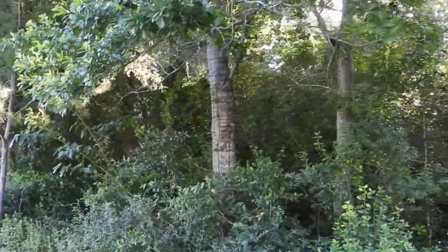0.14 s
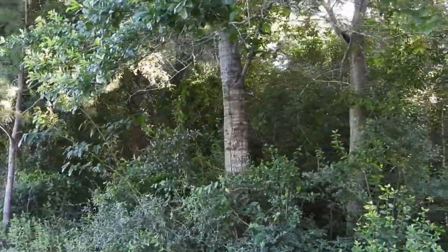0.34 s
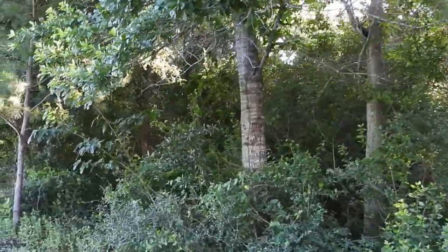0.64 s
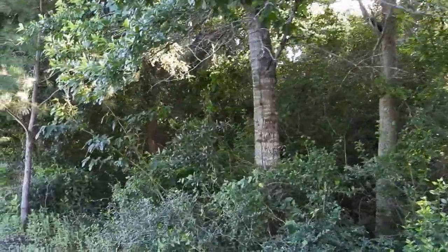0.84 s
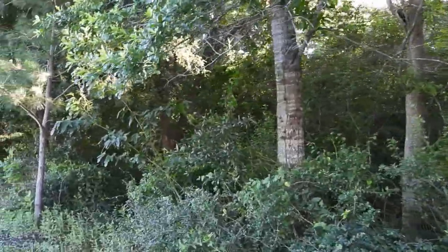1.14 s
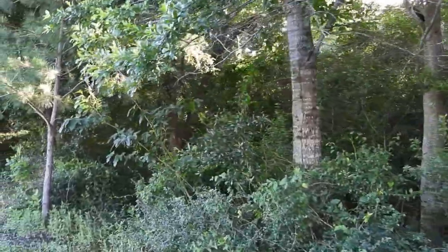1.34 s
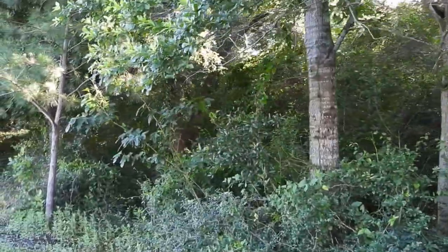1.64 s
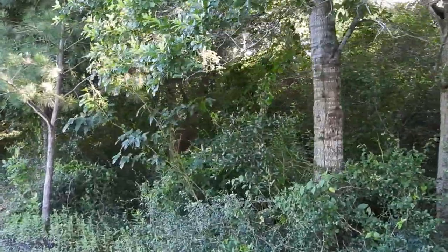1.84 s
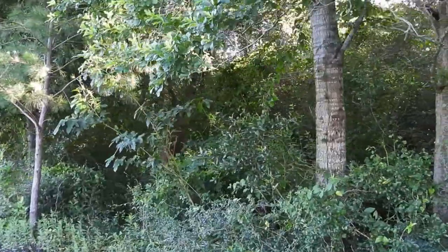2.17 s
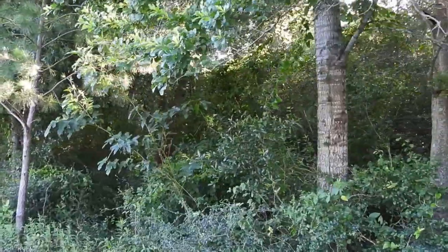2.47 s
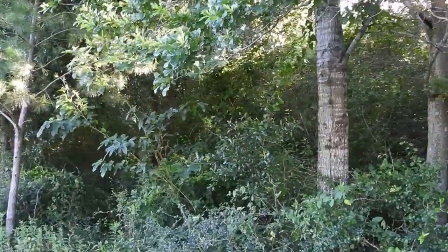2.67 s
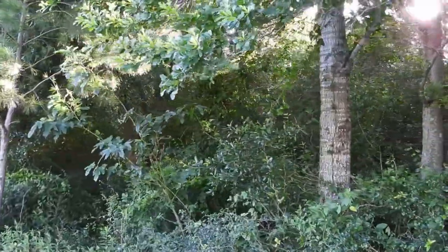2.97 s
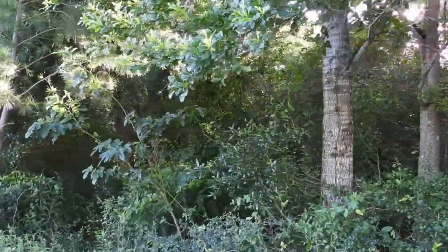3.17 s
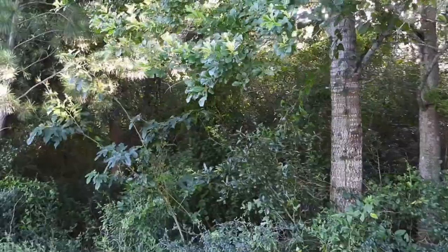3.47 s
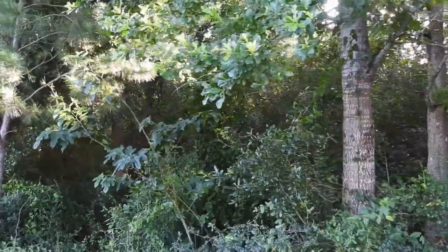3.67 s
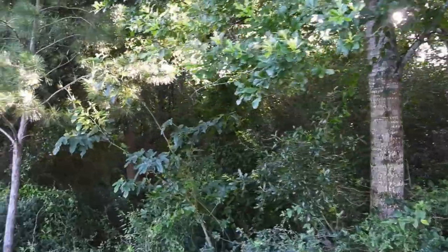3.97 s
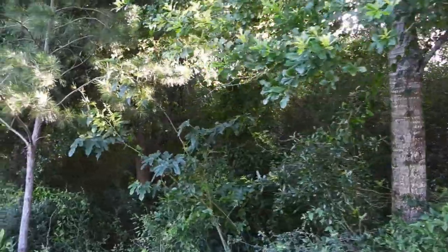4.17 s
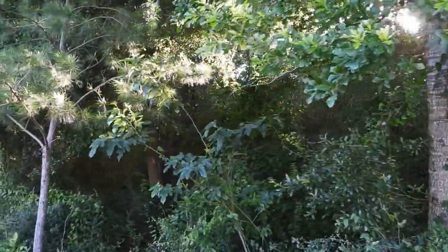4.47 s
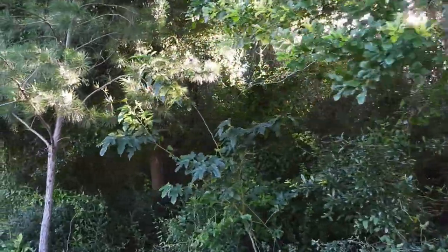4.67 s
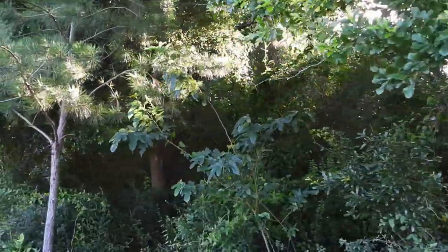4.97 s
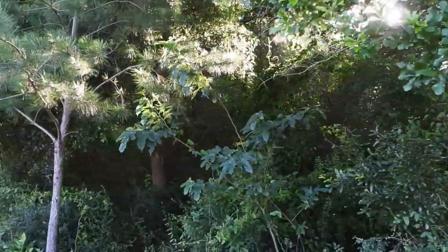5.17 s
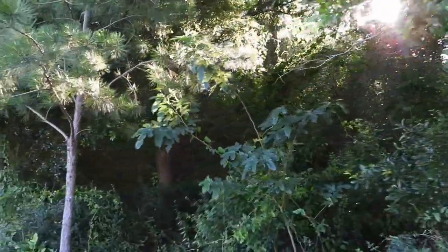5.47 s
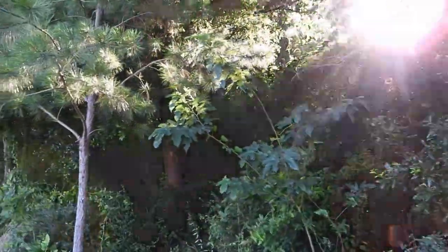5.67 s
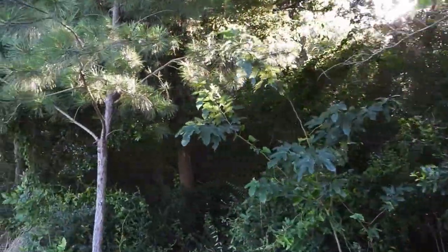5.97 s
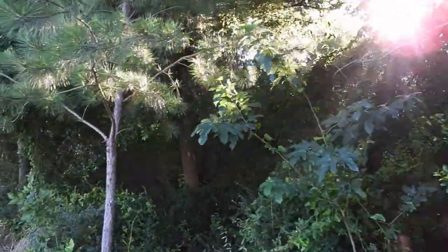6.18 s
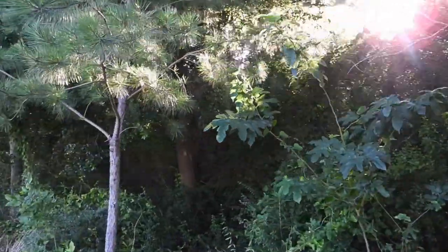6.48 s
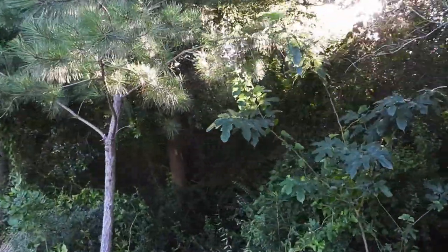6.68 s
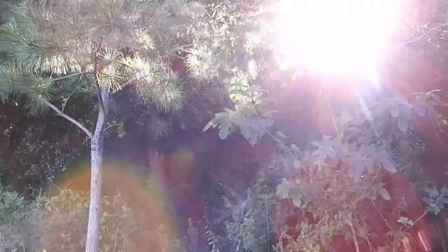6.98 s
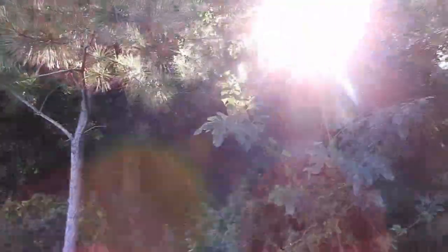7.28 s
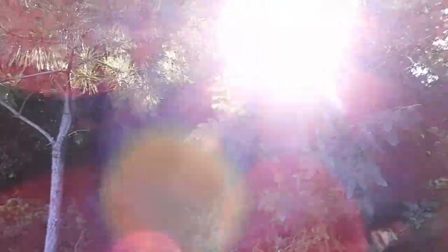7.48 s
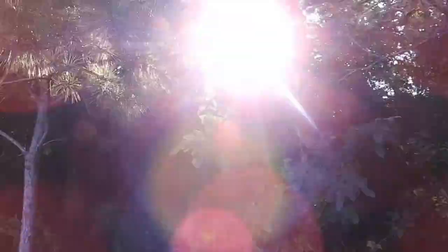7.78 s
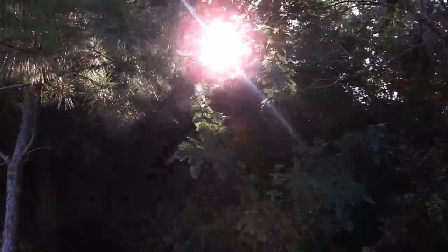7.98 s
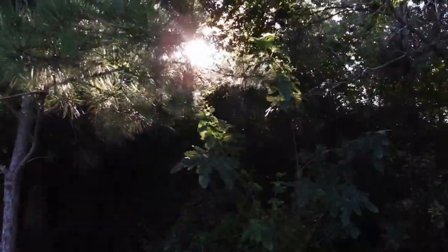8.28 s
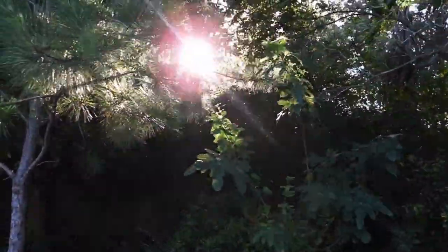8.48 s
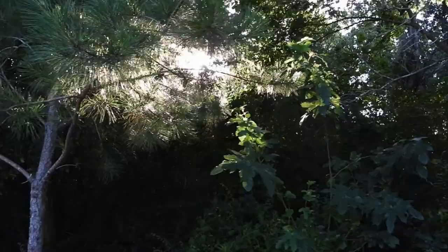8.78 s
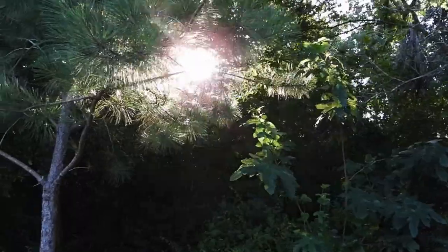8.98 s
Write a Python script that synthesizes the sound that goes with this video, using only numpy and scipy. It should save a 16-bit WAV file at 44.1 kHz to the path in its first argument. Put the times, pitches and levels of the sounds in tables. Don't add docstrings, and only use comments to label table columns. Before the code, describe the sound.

A steady insect chorus, a smooth buzz near 5.7 kHz and a finely pulsing one near 8 kHz, lies over low distant traffic throughout. A dull grip creak comes at 0.2 s; a faint rival wren and other birds chip far left from 0.1 to 2.3 s. At 2.5 s a clear wren opens with a falling note and chip, then four quick motifs of rising slur, tick, steep falling whistle and chip until about 4.1 s, ringing with woodland echo while the background lifts slightly. At 4.6 s wind knocks the right microphone. Creaks at 4.8, 5.0 and 5.7 s mix with tiny very high squeaks, a distant chip and soft leaf brushes at 5.0, 5.9 and 6.7 s. The second wren phrase runs 7.0-8.6 s, with low wind knocks left at 8.1 s and across both sides from 8.4 s.

```python
import sys
import numpy as np
from scipy import signal
from scipy.fft import rfft, irfft, next_fast_len
from scipy.io import wavfile
from scipy.ndimage import uniform_filter1d, map_coordinates

SR = 44100
rng = np.random.default_rng(int(sys.argv[2]) if len(sys.argv) > 2 else 0)


def digitize_waveform(pressure):
    field = np.atleast_2d(pressure).T
    bounded = np.clip(field, -1, 1)
    quanta = np.round(bounded * 32767).astype(np.int16)
    wavfile.write(sys.argv[1], SR, quanta)


def how_loud(loudness_db):
    steps = np.asarray(loudness_db, float) / 20
    return 10 ** steps


N = 402191


def unit(x):
    return x / np.sqrt(np.mean(x ** 2) + 1e-20)


def along(points, hz):
    f, v = np.transpose(points)
    return np.interp(np.log(hz + 1), np.log(f + 1), v)


def wobble(rate, size=N):
    knots = rng.standard_normal(int(size * 400 / SR) + 4)
    return map_coordinates(knots, [np.arange(size) * rate / SR])


def swell(s, db, length):
    return how_loud(db) * np.exp(-((np.arange(N) / SR - s) / length) ** 2)


def filtered(x, response):
    m = next_fast_len(N + 8192)
    return irfft(rfft(x, m) * response(np.fft.rfftfreq(m, 1 / SR)), m)[..., :N]


def ports(pair, alike, lead, lean):
    def blend(hz):
        turn = np.arccos(np.clip(along(alike, hz), -1, 1)) / 2
        return np.array([np.cos(turn), np.sin(turn)])

    def offset(hz):
        half = how_loud(along(lean, hz) / 2) * np.exp(.5j * along(lead, hz))
        return np.array([half, 1 / half])

    mid, side = filtered(pair, blend)
    return filtered(np.array([mid + side, mid - side]), offset)


def rush(spectrum, patchy_db):
    z = signal.stft(rng.standard_normal((2, N)), nperseg=512)[2]
    field = uniform_filter1d(rng.standard_normal(z.shape[1:]), size=6, axis=0)
    field = uniform_filter1d(field, size=12, axis=1)
    pair = signal.istft(z * how_loud(patchy_db * unit(field)), nperseg=512)[1][:, :N]
    return unit(filtered(pair, lambda hz: how_loud(along(spectrum, hz))))


def whistle(shape, overtone_db):
    s, hz, db = np.transpose(shape)
    t = np.arange(round(s[-1] * SR)) / SR
    turn = 2 * np.pi * np.cumsum(np.interp(t, s, hz)) / SR
    edge = signal.windows.tukey(len(t), .1)
    return edge * how_loud(np.interp(t, s, db)) * (np.sin(turn) + how_loud(overtone_db) * np.sin(2 * turn))


# freq_hz [Hz], t60_s [s]
WOOD_T60 = [(2050, 0.28), (2400, 0.88), (3200, 0.69), (4500, 0.93), (7000, 0.54)]


def add_with_echo(out, s, note, near_db, wet_db, deep_db, reach):
    hz, t, z = signal.stft(rng.standard_normal((2, SR)), SR, nperseg=256)
    decay = how_loud(-60 * t / along(WOOD_T60, hz)[:, None])
    tail = signal.istft(z * decay, SR, nperseg=256)[1][:, :SR]
    t = np.arange(SR) / SR
    near, thicket = how_loud(near_db - 60 * t / 0.067), how_loud(wet_db - 10 * (t / reach) ** 3)
    trunks = how_loud(1.6 * wobble(70, size=SR))
    path = tail * (near + thicket + how_loud(deep_db)) * trunks / np.sqrt(SR / 20)
    path[0, 0] = 1.1
    heard = signal.fftconvolve(note[None], path, axes=1)
    out[:, round(s * SR):][:, :heard.shape[1]] += heard


# time_s [s from note start], pitch_hz [Hz], level_db [dB]
OPENER = [(0, 4965, -17), (.008, 4590, 0.5), (.018, 4067, 2), (.028, 3534, -13), (.04, 3600, -10),
          (.044, 3450, -51)]
CHIP = [(0, 2744, -18), (.004, 3062, -7.5), (.008, 3183, 0), (.012, 3464, 1), (.015, 3680, -0.5),
        (.021, 4400, -4.5), (.026, 4520, -5.5), (.034, 4560, -17.5)]
GRACE = [(0, 1985, -12), (.008, 2062, -15), (.024, 2025, -8.5), (.034, 2030, -19)]
SLUR = [(0, 2188, -9), (.008, 2460, -6), (0.015, 2640, -0.5), (0.022, 2683, 0), (.04, 2940, 1.5),
        (0.053, 3033, 0.5), (.058, 3121, 1.5), (.074, 3222, -17.5), (0.081, 3203, -37)]
TICK = [(0, 5290, 1.5), (.003, 6020, 3), (.007, 6700, 3.5), (.011, 7060, -16.5)]
TOCK = [(0, 3790, -4.5), (.004, 4300, -4), (.009, 4650, -4), (.013, 4730, -16)]
FALL = [(0, 7296, -18.5), (.01, 6690, -9.5), (.028, 6202, -11), (.043, 5550, -15.5), (.047, 5327, -1.5),
        (.056, 4563, 1), (.064, 4050, -3), (.072, 3583, -3), (.084, 3496, -32)]
# start_s [s], level_db [dB]
PHRASES = [
    (2.47, -33),
    (7.003, -35),
]
# slur_start_s [s], slur_db [dB], held_top_push_db [dB], fall_and_chip_db [dB], fall_after_slur_s [s]
MOTIFS = [
    (2.621, -37.5, 13.5, -31, 0.16),
    (2.974, -33, 11.5, -31, .16),
    (3.33, -33, 8, -30, 0.16),
    (3.707, -36.5, 11.5, -30.5, 0.15),
    (7.158, -35, 4.5, -31.5, .163),
    (7.525, -35, 9, -30, .161),
    (7.896, -32, 5.5, -30, 0.16),
    (8.268, -34.5, 8.5, -32, .16),
]
# motif_number [count from 0], level_db [dB]
GRACED = [
    (3, -51),
    (6, -34),
    (7, -35),
]
# freq_hz [Hz], then likeness [0-1], left_lead_rad [rad] or left_over_right_db [dB]
SONG_ALIKE = [(2000, 1), (3200, 0.91), (4500, 0.2), (7000, 0.3)]
SONG_LEAD = [(2000, -.3), (2580, -1.1), (3960, -1.4), (4400, -1.9), (5400, -2.6), (6800, -3.4)]
SONG_LEAN = [(2000, -5), (3100, -4), (4300, -1.5), (5500, 0), (7000, -3)]


def wren():
    notes = [(MOTIFS[k][0] - .036, db, GRACE) for k, db in GRACED]
    for s, db in PHRASES:
        notes += [(s, db, OPENER), (s + .042, db + 1, CHIP)]
    for s, slur_db, push, db, fall_after in MOTIFS:
        slur = [(u, hz, level + push * (hz > 3100)) for u, hz, level in SLUR]
        tick_s, fall_s = s + .125, s + fall_after
        notes += [(s, slur_db, slur), (tick_s, db - 17, TICK), (tick_s, db - 14, TOCK)]
        notes += [(fall_s, db, FALL), (fall_s + .087, db, CHIP)]
    out = np.zeros((2, N + 2 * SR))
    for s, db, shape in notes:
        note = how_loud(db) * whistle(shape, overtone_db=-44.5)
        add_with_echo(out, s, note, near_db=3.5, wet_db=1.5, deep_db=-5.5, reach=.19)
    return ports(out[:, :N], SONG_ALIKE, SONG_LEAD, SONG_LEAN)


# time_s [s], peak_db [dB], pitch_hz [Hz], cycles [count]
ON_RIGHT = [(4.144, -45.5, 227, 2.8), (4.589, -27, 260, 2.4), (4.5963, -15, 320, 2), (4.613, -28, 330, 1.8),
            (4.622, -21.5, 315, 2.548), (4.634, -35, 350, 2.7), (4.645, -18.5, 375, 1.76),
            (4.653, -27, 397, 2.7), (4.668, -39, 450, 1.9), (4.681, -40, 427, 5.7), (5.193, -40, 220, 1.9),
            (5.295, -46, 186, 2.5), (5.617, -40, 234, 1.9)]
ON_LEFT = [
    (5.087, -39, 223, 2.7),
    (5.394, -47.5, 164, 3.9),
    (6.216, -35, 194, 1.95),
    (8.143, -30, 256, 2.3),
    (8.157, -37.5, 246, 4.3),
    (8.175, -39, 233, 3.2),
]
ACROSS = [
    (8.421, -34, 247, 2.4),
    (8.434, -38, 222, 5.3),
    (8.539, -45, 203, 2.7),
    (8.6, -44.5, 150, 3.2),
]


def wind():
    shelter_db, graze_db = 19, 15
    sides = [(ON_LEFT, [[0], [-shelter_db]]), (ON_RIGHT, [[-shelter_db], [0]]), (ACROSS, [[0], [-graze_db]])]
    out, t = np.zeros((2, N + SR)), np.arange(-2000, 2000) / SR
    for puffs, felt_db in sides:
        for s, db, hz, cycles in puffs:
            bell = np.exp(-(2.44 * t * hz / cycles) ** 2)
            swing = bell * (0.0065 + np.cos(2 * np.pi * hz * t * (1 + 6 * t)))
            out[:, round(s * SR) - 2000:][:, :len(t)] += how_loud(db + np.array(felt_db)) * swing
    lumps = how_loud(6 * np.array([wobble(25), wobble(25)]))
    band = [(20, -45), (60, -40.5), (100, -4.5), (140, -31.5), (200, 13.5), (300, 10.5), (500, -45.5),
            (900, -82)]
    return out[:, :N] + how_loud(-64.0) * unit(lumps * rush(band, patchy_db=-0.1))


# start_s [s], left_over_right_db [dB], level_db [dB], lower_mode_hz [Hz], upper_over_lower_db [dB]
CREAKS = [
    (.168, -1, -40, 2650, -4),
    (4.762, 25, -35.5, 3190, 6.5),
    (4.989, 2, -36.5, 3270, -19),
    (5.709, -12.5, -30.5, 3100, -9),
]


def hand():
    out, t = np.zeros((2, N + SR)), np.arange(2000) / SR
    contact = 3 * (1 - np.exp(-t / .003)) ** 2
    scrape_band = signal.butter(2, [2300, 5200], 'band', fs=SR)
    for s, lean_db, db, hz, upper_db in CREAKS:
        modes = np.sin(2 * np.pi * hz * t) + how_loud(upper_db) * np.sin(2 * np.pi * 1.38 * hz * t)
        ring = how_loud(db - 60 * t / .0073) * modes
        grit = signal.lfilter(*scrape_band, rng.standard_normal(len(t)))
        ring = ring + how_loud(db - 22 - 60 * t / .035) * grit
        sides = how_loud(6 + np.array([[lean_db], [-lean_db]]) / 2)
        out[:, round(s * SR):][:, :len(t)] += sides * ring * contact
    return out[:, :N]


# time_s [s], level_db [dB], pitch_hz [Hz], time_to_fall_9_db_s [s]
SQUEAKS = [
    (4.94, -56, 13050, .018),
    (5.02, -76, 13200, .07),
    (5.092, -64, 12150, .015),
    (5.05, -78, 12100, .06),
    (4.76, -78, 11400, .02),
    (6.82, -65, 13200, .02),
    (6.885, -76, 12800, .015),
]


def strap():
    t, out = np.arange(N) / SR, 0
    sides_rad = np.array([[.55], [-.55]])
    for s, db, hz, length in SQUEAKS:
        out = out + swell(s, db, length) * np.sin(2 * np.pi * hz * t + 1.8 * wobble(300) + sides_rad)
    return out


# time_s [s], peak_db [dB], time_to_fall_9_db_s [s]
BRUSHES = [
    (.51, -68, .05),
    (1.19, -67, .05),
    (5.0, -61, .07),
    (5.92, -59.5, .045),
    (6.72, -61, .035),
]
# freq_hz [Hz], density_db [dB per Hz]
RUBBED = [(1500, -24), (2300, 2.5), (3000, -7), (3600, 0), (4500, -13), (6000, -23.5), (9000, -59)]


def leaves():
    gain = sum(swell(*row) for row in BRUSHES) * how_loud(2.5 * wobble(60))
    return ports(gain * rush(RUBBED, patchy_db=3), [(3000, 0.76)], AIR_LEAD, [(3000, 6.7)])


# start_s [s], slide_db [dB], flick_db [dB]
RIVAL = [
    (.978, -60, -62),
    (1.355, -67.5, -62),
    (1.725, -76.5, -57),
    (2.112, -70, -55.5),
]
# first_hz [Hz], last_hz [Hz], length_s [s]
SLIDE = (2960, 2790, .057)
FLICK = (3250, 3650, .015)
# start_s [s], level_db [dB], first_hz [Hz], last_hz [Hz], length_s [s]
FAR = [
    (1.22, -71, 4300, 4660, .015),
    (2.09, -72, 1850, 2100, .11),
    (2.2, -67, 2080, 2330, .09),
    (2.31, -72, 2480, 2700, .11),
    (.11, -74, 4800, 4830, .012),
    (.492, -72, 3600, 3150, .03),
    (.18, -68, 6350, 6050, .062),
    (4.45, -74, 3700, 3290, .088),
    (4.966, -61, 3550, 3420, .0466),
]


def far_birds():
    calls = [(s, db, *SLIDE) for s, db, _ in RIVAL]
    calls += [(s + .137, db, *FLICK) for s, _, db in RIVAL]
    out = np.zeros((2, N + 2 * SR))
    for s, db, first, last, length in calls + FAR:
        shape = [(0, first, -9), (length / 3, .7 * first + .3 * last, 0), (length, last, -8)]
        note = how_loud(db) * whistle(shape, overtone_db=-40)
        add_with_echo(out, s, note, near_db=16, wet_db=0, deep_db=-24, reach=.1)
    return ports(out[:, :N], [(3000, 0.63)], AIR_LEAD, [(2300, 2), (3000, 4.8), (5000, 14)])


# freq_hz [Hz], density_db [dB per Hz]
LOW_BUZZ = [(2530, -30.5), (4300, -16.5), (4760, -13), (5650, 7.5), (5860, 5), (6240, -4.5), (6700, -7),
            (8710, -35.5), (14700, -120)]
HIGH_BUZZ = [(3880, -33), (6600, -17.5), (7800, -1), (8180, -2.5), (8460, -6), (9310, -8), (9830, -9),
             (10100, -16), (13100, -31), (22000, -120)]


def insects():
    beat = 2 * np.pi * np.cumsum(57.8 + 0.32 * wobble(3.2)) / SR
    pulsing = 1 + np.clip(0.1 + 0.09 * wobble(1.595), 0, 1) * np.sin(beat)
    low = how_loud(-60 + 0.49 * wobble(1.88)) * rush(LOW_BUZZ, patchy_db=1.4)
    high = how_loud(-55.5 + 0.44 * wobble(1.9)) * pulsing * rush(HIGH_BUZZ, patchy_db=1.2)
    return low + high


# freq_hz [Hz], density_db [dB per Hz]
HUM = [(18, -58), (30, -35), (102, -42.5), (158, -6), (426, 3), (494, 2), (526, -1.5), (890, 1),
       (2500, -15), (2830, -15), (3570, -23), (3970, -44.5), (4600, -29.5), (5980, -60), (10100, -120)]


def hum():
    return how_loud(-53.5 + 0.49 * wobble(2.054)) * rush(HUM, patchy_db=0.86)


# freq_hz [Hz], then likeness [0-1], left_lead_rad [rad] or left_over_right_db [dB]
AIR_ALIKE = [(60, 0.13), (260, 1), (530, 0.87), (1100, 0.94), (2300, 0.32), (4600, 0.5), (5700, 0.41),
             (7800, 0.45), (9600, .4)]
AIR_LEAD = [(100, 0), (500, .2), (1460, .6), (2300, .2), (3600, .4), (5300, -3.1), (5900, -3.4), (7800, -2),
            (9800, -1.6)]
AIR_LEAN = [(60, -1), (330, 1), (2000, 1), (5500, 0), (9600, 1)]


def scene():
    background = ports(insects() + hum(), AIR_ALIKE, AIR_LEAD, AIR_LEAN)
    air = wren() + wind() + hand() + leaves() + far_birds() + background
    return filtered(air, lambda hz: how_loud(-.1 * np.maximum(hz - 10250, 0))) + strap()


# from_s [s], until_s [s], lift_db [dB]
LOUD = [
    (2.505, 4.332, 7),
    (4.966, 5.092, 3),
    (7.03, 8.72, 6.5),
]


def low_pass(x):
    return signal.sosfilt(signal.butter(12, 13600, fs=SR, output="sos"), x)


def record(dry):
    rest_db, rise_db_per_s, sink_db_per_s = -6.5, 80, 15
    t = np.arange(N) / SR
    lifts = []
    for start, end, db in LOUD:
        ramp = np.minimum(rise_db_per_s * (t - start), db - sink_db_per_s * (t - end))
        lifts.append(np.clip(ramp, 0, db))
    mix = dry * how_loud(rest_db + np.max(lifts, axis=0))
    return low_pass(mix)


dry = scene()
out = record(dry)
digitize_waveform(out)
```